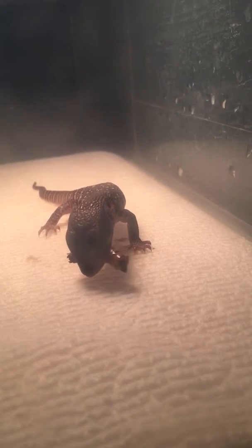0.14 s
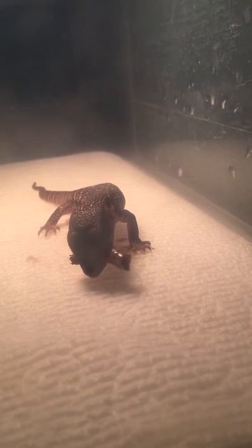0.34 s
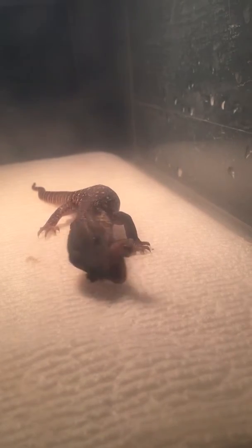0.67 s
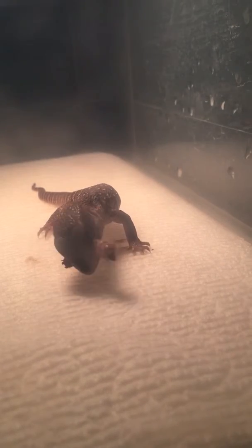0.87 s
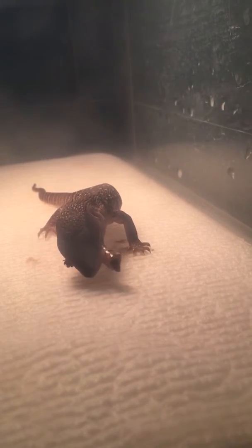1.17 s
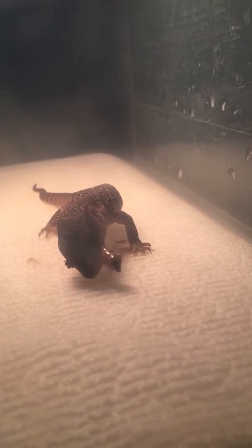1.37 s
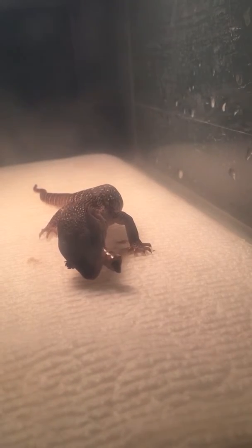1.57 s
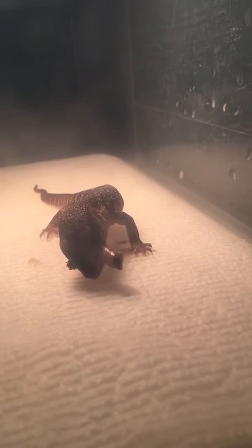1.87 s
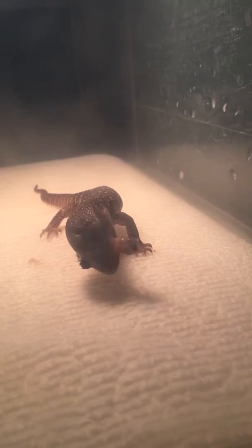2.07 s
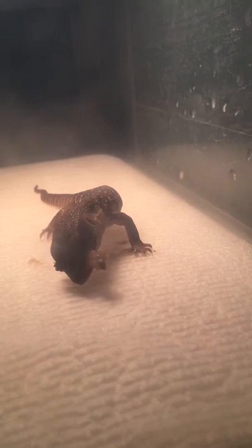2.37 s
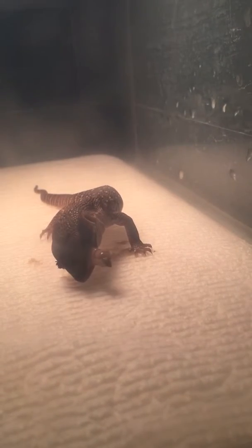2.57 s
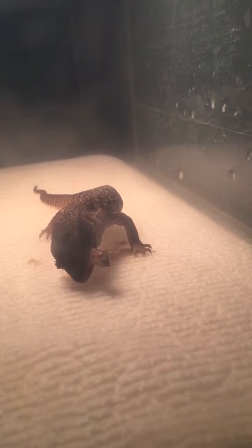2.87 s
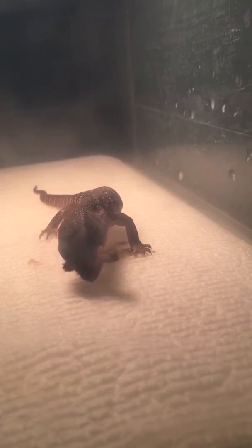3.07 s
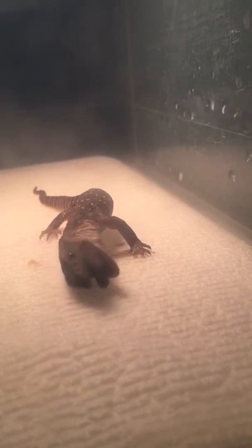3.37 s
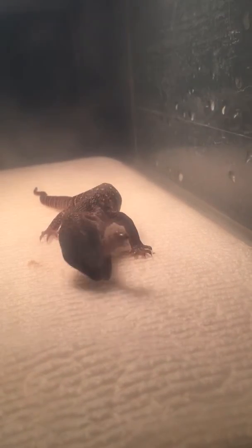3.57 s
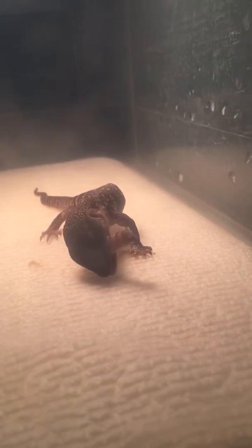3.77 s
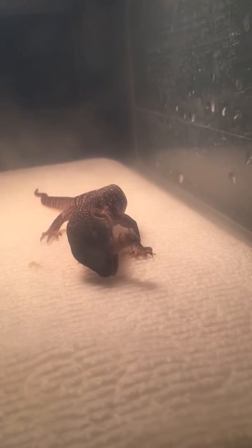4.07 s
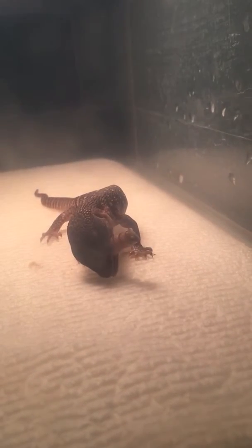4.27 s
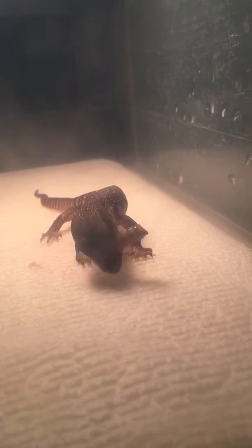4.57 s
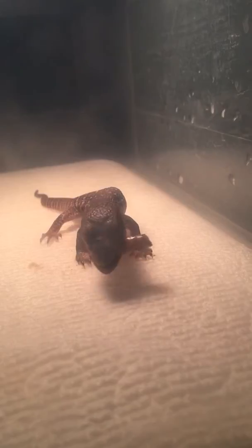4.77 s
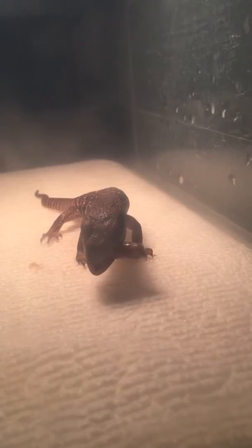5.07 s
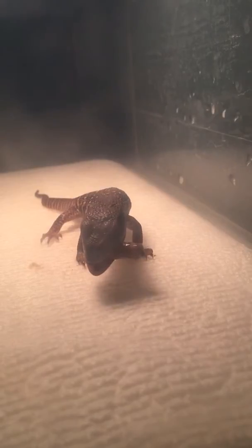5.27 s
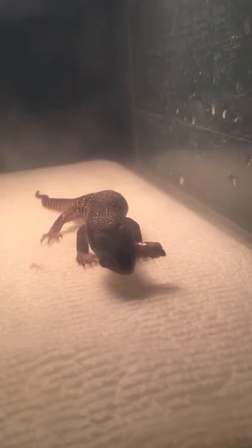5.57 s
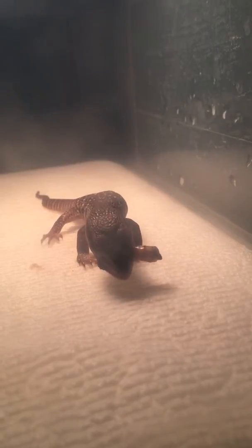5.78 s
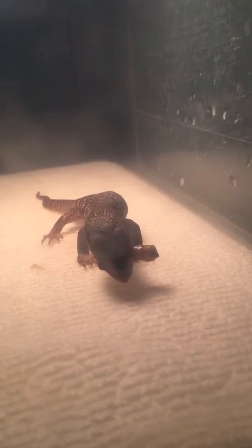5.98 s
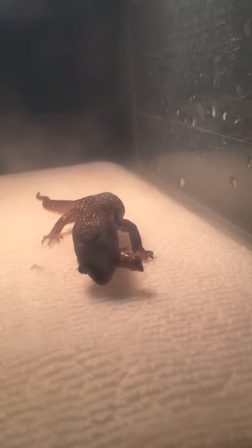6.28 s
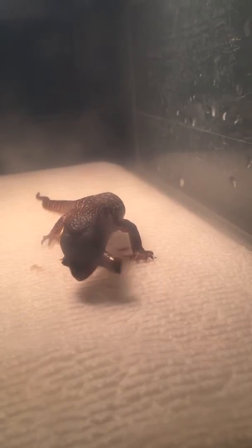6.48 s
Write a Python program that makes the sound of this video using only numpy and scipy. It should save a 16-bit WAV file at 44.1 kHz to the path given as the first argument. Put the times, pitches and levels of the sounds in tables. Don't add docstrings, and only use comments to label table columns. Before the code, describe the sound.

Throughout about 6.5 seconds, a quiet room holds a low, slightly throbbing motor hum, a soft wash of moving air and deep, faint rumbling gusts that swell irregularly, somewhat stronger around 3.2 and 3.9 s. A small lizard sits close to the microphone in a glass tank. In the first half second its skin and claws brush the mat very faintly; a barely audible tick comes at 0.8 s. At 1.58 s a tiny shell crack starts a thin, high, wet fizz, ended by a sharp, bright snap at 1.68 s with a short spurt. Small crisp ticks scatter until a louder, fuller snap at 1.88 s, joined by a brief scrape of the mat. Both snaps are extremely short, with a quick glassy room echo. Faint ticks follow at 2.08 and 2.35 s, a clearer little click at 2.67 s, then just hum, air and rumble to the end.

```python
import sys
import numpy as np
from scipy import signal
from scipy.fft import rfft, irfft, next_fast_len
from scipy.io import wavfile
from scipy.ndimage import uniform_filter1d

SR = 44100
rng = np.random.default_rng(int(sys.argv[2]) if len(sys.argv) > 2 else 0)


def transcribe(signal):
    frames = np.atleast_2d(signal).T
    limited = np.clip(frames, -1, 1)
    pcm = np.round(limited * 32767).astype(np.int16)
    wavfile.write(sys.argv[1], SR, pcm)


def volts_from_db(level):
    exponent = np.asarray(level, float) / 20
    return 10 ** exponent


N = 292905

# (time [s], peak level [dB], delay of second break [ms], its level [dB])
SNAPS = [
    (1.6751, -8.5, 0.36, -12),
    (1.8834, -4, .5, 4.5),
]
# (frequency [Hz], level [dB], time to fade 60 dB [s])
SNAP_MODES = [
    [(961, -40, 0.0056), (1520, -9, 0.00646), (2134.4, -0.5, 0.009843), (3295.3, -8, 0.002796),
     (4300, 2, 0.008408), (5500, -2, 0.003116), (7666.5, -4, 0.004547), (9897, -5, 0.002328),
     (10900, -21, 0.005009), (12709, -12, 0.003813)],
    [(561.97, -24, 0.01242), (753.4, -13.5, 0.009973), (1090, -5.5, 0.011), (2229.2, 1.5, 0.004612),
     (3031.7, 1, 0.005891), (4300, -2.5, 0.003984), (6175, -6, 0.003618), (7000, -10.5, 0.01151),
     (8120.5, -8, 0.0037), (10400, -5, 0.003092), (11897, -7.5, 0.004426), (13120, -12, 0.00427),
     (14793, -13.5, 0.00335)],
]
# (time [s], peak level [dB], centre [Hz], width [Hz], length [ms])
TICKS = [(.812, -47, 5000, 7000, 3.28), (1.582, -30, 4300, 5500, 1.218), (1.5816, -36, 8966, 9010, 1.458),
         (1.6055, -53.5, 13000, 6000, 1.002), (1.6215, -34, 12120, 4000, 2.8),
         (1.6989, -22, 5328, 2476, 0.796), (1.7246, -26.5, 11730, 2500, 1.6),
         (1.7250, -26, 4000, 5000, 0.75), (1.7485, -37.5, 12500, 7000, 1.467),
         (1.8147, -35, 7372, 7000, 1.472), (1.8224, -52, 12000, 5980, 1.496),
         (1.8513, -45, 7000, 7000, 1.205), (1.8598, -52.5, 13500, 5000, 1),
         (1.8700, -47.5, 12600, 7000, 1.8), (1.876, -43.5, 2499, 2500, 5), (1.881, -31.5, 2597, 2000, 1.2),
         (1.9074, -23, 4493, 6000, 1.1), (2.0847, -43, 10400, 9000, 1.197), (2.352, -46.5, 1458, 397, 9.84),
         (2.384, -46, 1520, 300, 12.72), (2.6690, -38.5, 1599, 1405, 1.385),
         (2.6694, -35.5, 3408, 3502, 0.778), (2.6695, -36, 11830, 6000, 0.593),
         (2.6692, -42.5, 7657, 2990, 2.487)]
# (peak time [s], level [dB], rise for 20 dB [s], fall for 20 dB [s])
FIZZ = [
    (1.625, -37, 0.013185, 0.5438),
    (1.677, -32, .012, 0.0184),
    (1.74, -59, .026, 0.1188),
]
# (start [s], end [s])
FIZZ_SPAN = (1.598, 1.675)
# (frequency [Hz], level [dB])
FIZZ_COLOUR = [(1000, -24.5), (5000, -18), (7500, -15), (9000, -10.5), (10400, -14.5), (12050, -2),
               (13400, -10), (14600, -8), (15500, -7.5), (16500, -9.5)]
# (peak time [s], level [dB], rise for 20 dB [s], fall for 20 dB [s])
BRUSH = [
    [(.06, -60.5, 0.1326, 0.1714), (.41, -66.5, 0.1403, 0.1031), (.58, -77.5, 0.398, .5)],
    [(1.81, -63.5, 0.1017, 0.94), (1.885, -47.5, 0.069, 0.0846), (2.0, -66, .1, 7)],
]
# (frequency [Hz], level [dB])
BRUSH_COLOUR = [(800, -13.5), (2500, 10.5), (5000, 4), (8000, 0), (10300, -4), (12000, -1.5), (15700, -8.5),
                (15900, -39.5)]
# (delay [ms], level [dB], smear [ms], mirror-like share [0-1])
ECHOES = [(2.7484, -7.5, 3.89, 0.05), (7.7439, -5, 2.308, 0.63), (9.3062, -5.5, 2.484, 0.09),
          (15.667, -15.5, 3.15, 0.27), (24.615, -14.5, 1.31, 0.46)]
# (frequency [Hz], time to fade 60 dB [s])
TAIL = [(500, 0.0581), (1500, 0.24926), (3000, 0.2023), (6000, 0.24066), (12000, 0.1604)]
# (frequency [Hz], width [Hz], level [dB])
MIC_PORT = [(1345, 160, -14), (4915.3, 370, -3.5), (10255, 323, -16)]
# (lower sideband [dB], magnetic hum [dB], upper sideband [dB])
HUM_LEVELS = (-54, -60.5, -58.5)
# (frequency [Hz], level per Hz [dB])
AIR = [(12, -33.5), (27, -18.5), (36, -7), (130, -5.5), (280, -20), (460, -24.5), (800, -20), (1300, -24),
       (2300, -27), (3000, -34.5), (4500, -38), (7000, -40), (10000, -46.5), (16000, -57)]
# (frequency [Hz], width [Hz], level [dB])
ROOM_MODES = [(58, 12.73, 2), (293.59, 6.633, -5.5), (645.7, 19.92, -3), (747.54, 10.34, -19),
              (1265.5, 30.6, -4), (1444.8, 11.25, -10), (76.5, 5, 0), (103.69, 19.838, 5.5),
              (138.04, 3.117, -4.5), (191.08, 13.254, -8), (199.83, 6.778, 13.5), (220.48, 7.18, 5),
              (310.38, 15, 6), (375.35, 33.13, 7.5), (464.52, 11.74, -9.5), (617.07, 24.43, 4.5),
              (938.06, 57.98, 9), (1010.6, 40.58, -6), (1113.3, 91.77, 9), (1454.6, 71.8, 6),
              (1785.7, 15.51, 7), (2261.9, 34.8, 4), (3243.1, 52.9, 4), (3647, 209.6, 3.5),
              (4911, 142.35, -5), (5500, 160, 0.5), (7404.4, 80.7, 5), (7549.9, 181.95, -7),
              (10400, 498, -6.5), (11700, 900, 0)]
# (peak time [s], level [dB], fall for 20 dB [s], frequency [Hz])
GUSTS = [(.16, -50.5, 0.2231, 58), (.7, -49.5, 0.6749, 60.3), (1.44, -47, 0.0831, 56.07),
         (1.68, -50, 0.5335, 60.28), (1.98, -49.5, 0.01, 60.38), (2.26, -49.5, 0.1464, 60),
         (2.4, -50.5, 0.2271, 62.96), (2.65, -44.5, 0.4004, 59.84), (2.9, -51, 0.0715, 60),
         (3.2, -44, 0.08, 60), (3.5, -50.5, 0.1563, 63.16), (3.92, -41, 0.1282, 60.28),
         (4.23, -46, 0.1739, 56.02), (4.62, -45, 1.301, 59.01), (5.31, -44.5, .5, 60.92),
         (5.9, -51.5, 1.0338, 57.24), (6.08, -46, 0.3246, 59.74), (6.5, -49, 1.1452, 61.96)]
# (frequency [Hz], level [dB])
TOP_EDGE = [(15800, 0), (16050, -24), (16450, -26), (16700, -90)]


def evened(x):
    return x / np.sqrt(np.mean(x ** 2) + 1e-20)


def read(points, hz):
    f, value = np.transpose(points)
    return np.interp(np.log(hz + 1), np.log(f + 1), value)


def add(mix, s, sound):
    part = mix[..., round(s * SR):][..., :sound.shape[-1]]
    part += sound[..., :part.shape[-1]]


def swells(t, rows):
    s, db, rise_s, fall_s = np.transpose(rows)[:, :, None]
    return volts_from_db(db - 20 * np.maximum((s - t) / rise_s, (t - s) / fall_s)).max(0)


def scattered(noise, ms, sharp):
    sharp, step = np.clip(sharp, 0, 1), np.arange(len(noise))
    scatter = noise * np.exp(-step * 1000 / (SR * ms))
    scatter = scatter / np.linalg.norm(scatter)
    return np.sqrt(sharp) * (step == 0) + np.sqrt(1 - sharp) * scatter


def coloured(x, colour):
    hz = np.fft.rfftfreq(len(x), 1 / SR)
    return evened(irfft(rfft(x) * volts_from_db(read(colour, hz)), len(x)))


def grains(gain, colour, per_s, spread_db):
    chance, size, sign = rng.random(N), rng.exponential(1, N), rng.standard_normal(N)
    clicks = (chance < per_s / SR) * volts_from_db(spread_db * np.minimum(size, 4)) * sign
    fast = next_fast_len(N) // 2 * 2
    padded = np.pad(clicks, (0, fast + 2 - N))[:fast]
    return coloured(padded, colour)[:N] * gain


def snap(modes, second_ms, second_db):
    t = np.arange(1500) / SR
    ring = np.zeros(len(t))
    for k, (hz, db, t60) in enumerate(modes):
        ring += (-1) ** k * volts_from_db(db - 60 * t / t60) * np.sin(2 * np.pi * hz * t)
    ring = signal.lfilter(*signal.butter(2, 520, "high", fs=SR), ring)
    softer = signal.lfilter([1 - .55], [1, -.55], ring)
    delayed = np.pad(softer, (round(second_ms * SR / 1000), 0))[:len(t)]
    both = ring + volts_from_db(second_db) * delayed
    even = ring * np.linalg.norm(both) / np.linalg.norm(ring)
    return np.array([both, even]) / abs(both).max()


def tick(db, hz, width_hz, ms, noise):
    r = np.exp(-np.pi * width_hz / SR)
    stage = [1, 0, -r, 1, -2 * r * np.cos(2 * np.pi * hz / SR), r * r]
    cracks = [scattered(noise, ms, sharp) for sharp in (.6, .93)]
    burst = signal.sosfilt([stage, stage], cracks)
    return volts_from_db(db) * burst / abs(burst[0]).max()


def fizz():
    t = np.arange(N) / SR
    start_s, end_s = FIZZ_SPAN
    first = swells(t, FIZZ[:1]) * (t > start_s) * (t < end_s)
    gain = np.maximum(first, swells(t, FIZZ[1:]))
    return grains(gain, FIZZ_COLOUR, per_s=20000, spread_db=1.5)


def brushing():
    t = np.arange(N) / SR
    lift_s = 2.288
    total = np.zeros(N)
    for rows in BRUSH:
        total += grains(swells(t, rows) * (t < lift_s), BRUSH_COLOUR, per_s=18000, spread_db=1.5)
    return total


def room():
    tail_db, taps_per_s, tail_start_ms = -4.5, 2200, 7.5
    t = np.arange(SR // 2) / SR
    early = np.zeros(len(t))
    for (ms, db, smear_ms, sharp), noise in zip(ECHOES, rng.standard_normal((len(ECHOES), 600))):
        add(early, ms / 1000, volts_from_db(db) * scattered(noise, smear_ms, sharp))
    early = signal.lfilter([1 - .3], [1, -.3], early)
    crowding = 1 + 30 * t
    taps = rng.standard_normal(len(t)) * (rng.random(len(t)) < taps_per_s * crowding / SR)
    hz, frame_s, z = signal.stft(taps / np.sqrt(crowding), SR, nperseg=256)
    fade = volts_from_db(-60 * frame_s / read(TAIL, hz)[:, None])
    tail = signal.istft(z * fade, SR, nperseg=256)[1][:len(t)]
    tail = tail * np.clip((t * 1000 - tail_start_ms) / 3, 0, 1)
    return early + volts_from_db(tail_db) * tail / np.linalg.norm(tail)


def port(x):
    for hz, width_hz, db in MIC_PORT:
        x = x - (1 - volts_from_db(db)) * signal.lfilter(*signal.iirpeak(hz, hz / width_hz, SR), x)
    return x


def motor():
    hum_hz, rotor_hz, rotor_start_turns = 240.025, 18.93, -.12
    t = np.arange(N) / SR
    hum, rotor = hum_hz * t + rng.random(), rotor_hz * t + rotor_start_turns
    total = np.zeros(N)
    for k, db in zip((-1, 0, 1), HUM_LEVELS):
        turns = hum + k * rotor + .045 * k * k
        total += volts_from_db(db) * np.sqrt(2) * np.cos(2 * np.pi * turns)
    return total


def air():
    level_db, patchy_db, ripple_db, edge_hz = -49, 0.6864, 1.3913, 15800
    size = next_fast_len(N)
    hz = np.fft.rfftfreq(size, 1 / SR)
    shape_db = read(AIR, hz)
    for f, width_hz, db in ROOM_MODES:
        shape_db = shape_db + db / (1 + ((hz - f) / width_hz) ** 2)
    ripple = uniform_filter1d(uniform_filter1d(rng.standard_normal(len(hz)), size=90), size=90)
    shape_db = shape_db + ripple_db * evened(ripple) * (hz > 420)
    noise = irfft(rfft(rng.standard_normal(size)) * volts_from_db(shape_db) * (hz < edge_hz), size)
    z = signal.stft(noise, nperseg=1024)[2]
    patches = uniform_filter1d(rng.standard_normal(z.shape), 10, axis=0)
    patches = evened(uniform_filter1d(patches, 6, axis=1))
    patchy = signal.istft(z * volts_from_db(patchy_db * patches), nperseg=1024)[1][:N]
    return volts_from_db(level_db) * evened(patchy)


def rumble():
    rise_s = 0.14965
    t = np.arange(N) / SR
    total = np.zeros(N)
    for s, db, fall_s, hz in GUSTS:
        gain = swells(t, [(s, db - 3.0, rise_s, fall_s)])
        total += gain * np.sqrt(2) * np.sin(2 * np.pi * hz * t)
    return total


def scene():
    bite = np.zeros((2, N))
    for (s, db, *second), modes in zip(SNAPS, SNAP_MODES):
        add(bite, s, volts_from_db(db) * snap(modes, *second))
    for (s, *crack), noise in zip(TICKS, rng.standard_normal((len(TICKS), 2048))):
        add(bite, s, tick(*crack, noise))
    add(bite, 0, fizz())
    direct, sent = bite
    echoed = signal.fftconvolve(sent, room())[:N]
    background = motor() + air() + rumble()
    return (port(direct + echoed) + brushing() + background)[None]


def top_cut(x):
    return signal.sosfilt(signal.butter(12, 16540, fs=SR, output="sos"), x)


def record(dry):
    hz = np.linspace(0, SR / 2, num=512)
    limit = signal.firwin2(511, hz, volts_from_db(read(TOP_EDGE, hz)) * (hz < SR / 2), fs=SR)
    mix = signal.oaconvolve(dry, limit[None], "same")
    return top_cut(mix)


dry = scene()
out = record(dry)
transcribe(out)
```